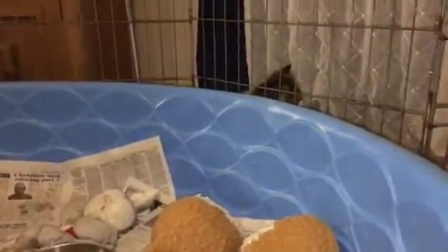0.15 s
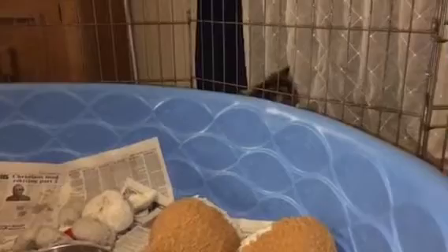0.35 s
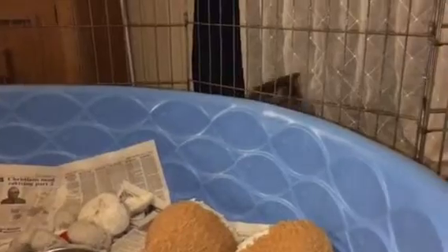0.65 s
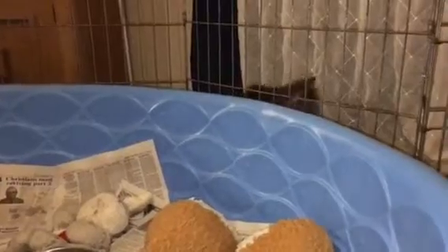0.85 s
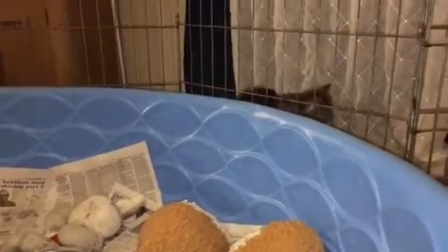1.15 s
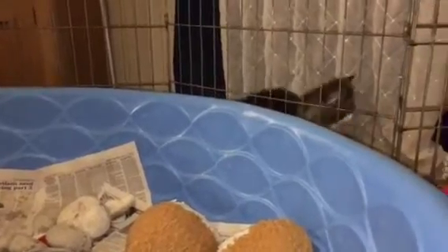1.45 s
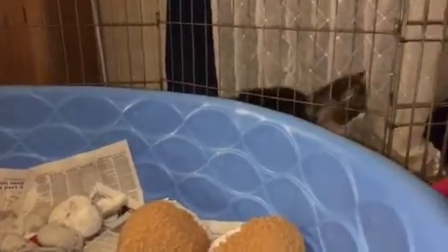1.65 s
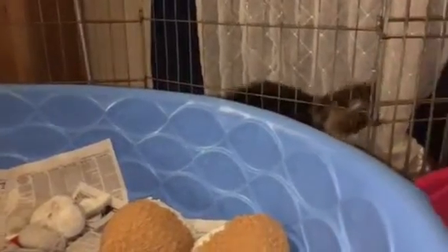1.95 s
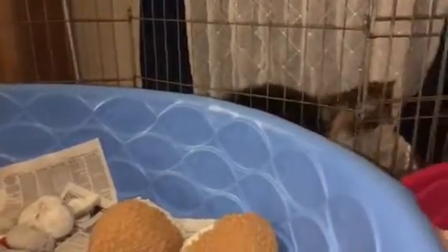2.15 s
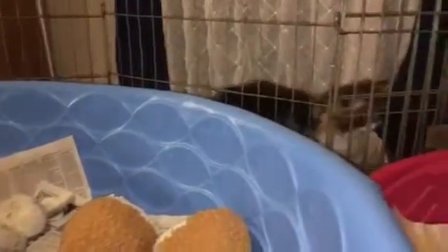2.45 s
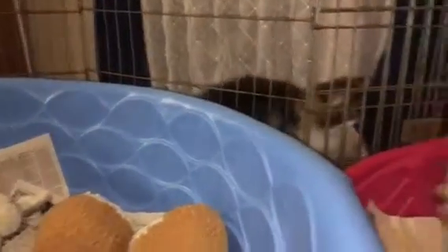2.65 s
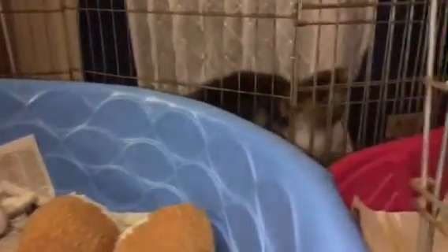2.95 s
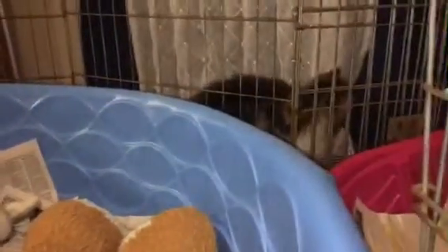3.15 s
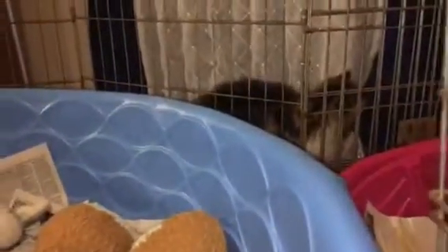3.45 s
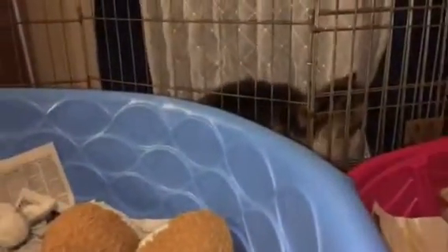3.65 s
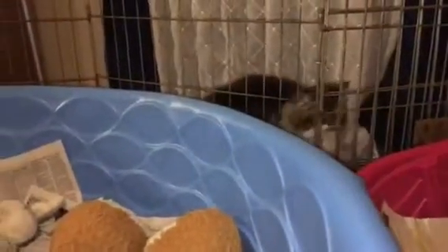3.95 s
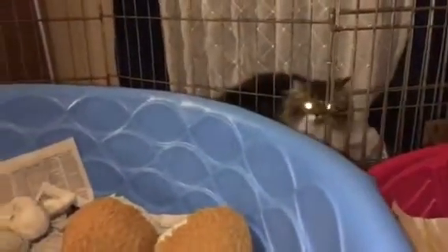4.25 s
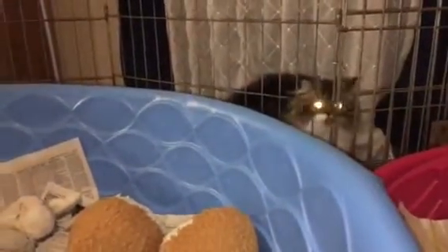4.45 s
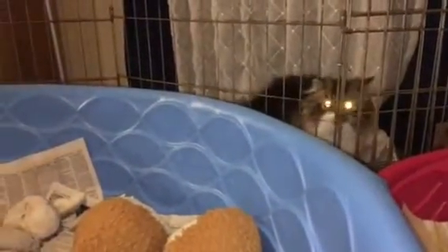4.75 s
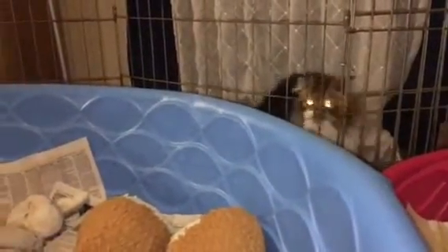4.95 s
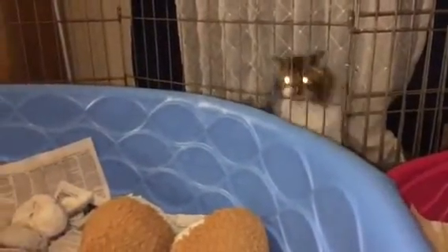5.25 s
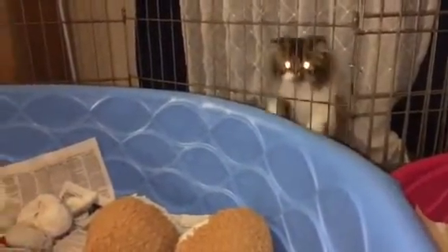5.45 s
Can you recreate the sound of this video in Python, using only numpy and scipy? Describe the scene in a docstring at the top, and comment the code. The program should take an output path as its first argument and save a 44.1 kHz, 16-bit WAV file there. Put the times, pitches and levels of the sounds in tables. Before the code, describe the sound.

In a small furnished room, a kitten and perhaps other young animals shift about on newspaper in a wire pen. From the start the paper crackles in quick irregular snaps with dull scuffing beneath, the sharpest crackle at about 0.4 s and another cluster near 0.7 s. Two deep, soft paw thuds land almost together at 0.75 s, with lighter steps around 1.0 s. At about 1.2 s a hard, hollow knock on plastic, the loudest event, rings very briefly among further thuds. Crisp paper ticks and short crumples continue to about 1.9 s, then thin out, with a small cluster near 2.4-2.6 s. Gentle bright rustling and ticks return around 3.6-4.0 s. The rest is nearly still: isolated crinkles at 4.7 and 5.3 s, and two very faint dull taps near 5.2 s. A faint wavering low hum and quiet room air lie underneath throughout; reflections are short.

```python
"""Small room, wire pen with newspaper and a plastic paddling pool: young animals move about.
Paper snaps (noise bursts coloured by a facet), crumples (dying slips) and slides (enveloped slips and noise).
Paws thud on the floor and a knock hits the plastic, with two faint taps later: both ring banks of modes.
An appliance hums faintly (wavering sine) over still air (coloured noise)."""
import sys
import numpy as np
from scipy import signal
from scipy.fft import rfft, irfft
from scipy.io import wavfile

SR = 44100
rng = np.random.default_rng(int(sys.argv[2]) if len(sys.argv) > 2 else 0)


def output_pcm(signal):
    """Save a mono or channel-first signal as 16-bit PCM at the path in sys.argv[1].

    Samples are clipped to [-1, 1] before scaling.
    """
    pcm = np.clip(np.atleast_2d(signal).T, -1, 1) * 32767
    wavfile.write(sys.argv[1], SR, np.round(pcm).astype(np.int16))


N = 246959
BINS_HZ = np.fft.rfftfreq(2048, 1 / SR)
TIME_S = np.arange(N) / SR
RING_S = np.arange(SR // 2) / SR

# Creases flipping over; levels before trim: time_s, level_db, facet_hz, tick_re_level_db
CREASE_SNAPS = [(0.0723, -48, 2980, -20), (0.096, -52.5, 3400, -11), (0.128, -46.5, 2590, -1),
                (0.151, -44, 2500, -16), (.1913, -50, 2300, -25), (.259, -50.5, 3570, -10),
                (.309, -44, 3900, -12), (0.3265, -45, 3600, -5), (0.3555, -45, 2640, -20),
                (0.3742, -54, 2970, -2), (.3833, -35.5, 3740, -5), (0.3885, -32, 2980, -24),
                (.484, -46.5, 5670, -3.5), (0.5385, -48.5, 4300, -8), (0.6835, -40.5, 3900, -13),
                (.6944, -38, 3320, -24), (0.7279, -48, 2420, -25), (1.216, -42, 2240, -10),
                (1.2507, -40, 5630, -4.5), (1.3751, -55, 3660, -9.5), (1.479, -38.5, 6080, -13),
                (1.6296, -48, 2920, -6), (1.69, -42, 2980, -24), (1.872, -49.5, 2800, -19),
                (1.8897, -42, 3150, -12), (2.196, -59.5, 3370, -18), (2.4113, -48, 2230, -15),
                (2.4755, -49, 2530, -7), (2.528, -48.5, 3000, -13), (2.5932, -48, 3500, -18),
                (2.6327, -51.5, 3160, -5), (2.9679, -52, 3000, -13), (3.272, -56.5, 1850, -12),
                (3.664, -48, 5040, 0.5), (3.7295, -57, 2220, -12), (3.7753, -57, 3300, -14),
                (3.788, -52, 2100, -8), (3.8232, -50.5, 3300, 1.5), (3.885, -56, 3040, 0),
                (3.9283, -53.5, 5430, -7), (3.9636, -57, 3400, -15), (4.2392, -65.5, 3190, -13),
                (4.259, -58.5, 1410, -23), (4.6891, -48.5, 4000, -9.5), (5.2665, -47.5, 6270, -8.5),
                (5.3366, -52.5, 6440, -13), (5.4976, -57.5, 2200, -19)]
# Paw crushes a patch of paper: time_s, level_db, t60_s, tilt_db_per_octave
PAPER_CRUMPLES = [(.127, -51, 0.32, 2.5), (.145, -57, 0.12, -9), (0.292, -49.5, 0.26, 0),
                  (0.323, -42.5, 0.08, -0.5), (0.384, -37.5, 0.11, -1), (.484, -48.5, 0.14, 0.5),
                  (.683, -39.5, 0.057, 1.5), (.692, -44, 0.21, -3.5), (1.417, -51.5, 0.15, -2.5),
                  (1.481, -52, 0.19, 2.5), (1.602, -51.5, 0.32, 1.5), (1.628, -44.5, 0.14, -1.5),
                  (1.870, -48, 0.09, -1.5), (1.911, -53, 0.14, -2), (2.628, -51, 0.087, -1),
                  (3.786, -52.5, 0.24, -3.5), (5.337, -59.5, 0.19, 1), (5.498, -56, 0.05, -4.5)]
# Paw drags the sheet; levels before trim; touch 0 = pressed, dull .. 1 = skimmed, bright:
# start_s, rise_s, length_s, level_db, touch, hiss_re_level_db
PAPER_STROKES = [(0, 0.0035, 0.18, -59.5, 0.17, -5), (0.227, 0.054, 0.15, -59, .45, -2),
                 (0.446, 0.018, 0.073, -56.5, .4, -9), (0.604, 0.025, 0.23, -67, 0.49, -4),
                 (0.764, .05, 0.07, -57.5, 0.46, -4), (0.918, 0.026, 0.048, -52.5, .1, -5),
                 (1.111, 0.097, 0.11, -59.5, 0.74, -4), (1.337, 0.027, 0.26, -65.5, 0.98, -14),
                 (1.603, .025, .12, -58, 0.18, -3.5), (1.843, .02, 0.072, -65.5, 0.24, -4),
                 (2.226, 0.074, 0.1, -60.5, 0.098, -4.5), (2.326, 0.051, 0.14, -57, 0.088, -6.5),
                 (2.603, .025, 0.061, -59.5, 0.31, -10), (2.955, 0.024, 0.16, -66, 0.46, -7.5),
                 (3.116, 0.094, 0.12, -59, 0.95, -3.5), (3.25, .04, .09, -68.5, 0.46, -3),
                 (3.375, .04, 0.25, -76, .6, -3), (3.563, 0.093, 0.27, -63, 0.98, 0.5),
                 (3.855, .04, 0.14, -66.5, 0.9, -0.5), (4.06, .04, 0.32, -77.5, 0.59, -0.5),
                 (4.55, .03, .08, -78.5, 0.51, -3.5), (4.73, .03, 0.05, -87, .8, -2),
                 (4.872, .09, 0.26, -77.5, 0.94, -2), (5.122, 0.067, 0.14, -70.5, 0.6, -4.5),
                 (5.32, .02, 0.064, -72, 0.81, -1), (5.565, 0.023, .04, -76.5, 0.16, -12)]
# Paw or flank scuffs the floor; levels before trim: start_s, length_s, level_db
FLOOR_SCUFFS = [(0, 0.22, -62), (0.276, 0.095, -52.5), (0.437, 0.21, -60.5), (0.774, 0.063, -51),
                (0.876, .14, -58), (1.09, 0.28, -58.5), (1.35, 0.085, -57.5), (1.611, 0.15, -59.5),
                (1.752, 0.089, -61), (2.005, 0.23, -65.5), (2.315, 0.25, -63.5), (2.59, 0.19, -68.5),
                (2.85, 0.27, -71), (3.29, 0.065, -65), (3.407, 0.25, -72.5), (3.63, 0.15, -64.5),
                (3.77, 0.22, -62), (4.204, 0.066, -71), (4.544, 0.029, -69.5), (5.11, 0.048, -66),
                (5.565, .03, -63.5)]
# Paw landings: time_s, level_db, favoured_hz, rattle_re_ring_db
PAW_THUDS = [(.384, -40.5, 100, -7), (.624, -43, 126, -14), (.71, -40, 271, -23),
             (.74, -21.5, 101.6, -19.5), (.76, -22.5, 136, -21.5), (0.784, -37.5, 292, -9),
             (1.014, -30.5, 103.4, -8.5), (1.034, -33, 79, -32), (1.183, -28.5, 201, -14),
             (1.204, -26.5, 129, -22), (1.255, -44, 243, -24), (1.342, -29.5, 168.6, -18.5),
             (1.382, -39, 136.7, -14), (1.49, -42.5, 70.4, -17), (1.68, -40.5, 204, -31),
             (1.701, -35, 130, -25), (1.824, -44, 232, -25), (1.834, -49, 81, -31), (1.864, -41, 62, -27),
             (2.067, -51, 70.5, -20), (2.343, -49, 192, -26), (2.385, -46, 66, -17), (2.84, -47.5, 55, -22),
             (2.973, -55, 145, -12), (3.787, -53, 212, -20.5), (5.189, -51.5, 230, -28.5),
             (5.322, -43, 121, -14)]
# Pen floor resonances: mode_hz, level_db, t60_s
FLOOR_MODES = [(55, -4, 0.22), (92, 1, 0.16), (132, 1.5, 0.15), (143.5, -5.5, 0.34), (193.4, -9.5, 0.18),
               (216, -9, 0.19), (249, -8.5, 0.16), (320.5, -5, 0.092), (348, -13, 0.11)]
# Blows on the plastic: time_s, level_db, fade_above_hz
PLASTIC_KNOCKS = [(1.1807, -19.5, 3000), (5.191, -51.5, 420), (5.198, -55.5, 520)]
# Plastic wall resonances: mode_hz, level_db, t60_s
WALL_MODES = [(334.4, -10.5, 0.137), (423, -8.5, .07), (492, -6, 0.044), (647, -3, 0.093), (827, 2, 0.085),
              (899, -1.5, 0.08), (1273, -2, .07), (1410, 1.5, 0.07), (1545, -1, 0.044), (1716, 1, 0.07),
              (1890, 1, .065), (2176, -4, .05), (2540, -6.5, 0.066), (3300, -10, 0.08)]
# Appliance tones, peak level before waver: tone_hz, level_db
HUM_TONES = [(119.6, -61)]
# Reverberation of the room: band_hz, t60_s
ROOM_DECAY = [(100, 1), (400, 0.52), (1500, 0.2), (5000, 0.17), (14000, 0.28)]

# Relative spectra, all with columns: frequency_hz, gain_db
# Paper body
PAPER_COLOUR = [(150, 2), (500, -5), (1000, -0.5), (2300, 2), (4000, -1), (5000, -3), (8000, -7),
                (10500, -12.5), (12500, -7), (16000, -31)]
# Fine tick of a crease
TICK_COLOUR = [(1000, -65.5), (4000, -7), (7000, -15.5), (9000, 5.5), (10500, -3), (12500, 0),
               (16000, -4.5)]
# Sheet pressed flat
PRESSED_COLOUR = [(600, -37), (1400, -6), (2100, 3), (3000, 0), (3900, 0), (4700, -5.5), (6000, -13),
                  (9000, -26.5), (14000, -25)]
# Sheet skimmed lightly
SKIMMED_COLOUR = [(600, -40), (2000, -16), (3200, 3), (4500, -2.5), (5900, 2), (7200, -5), (9000, -7.5),
                  (14000, -33.5)]
# Fine hiss of sliding
HISS_COLOUR = [(3000, -55.5), (6000, -7), (9000, 2.5), (10400, -3.5), (12500, -1.5), (16000, -11)]
# Dull floor scuffing
SCUFF_COLOUR = [(60, -30.5), (200, 7.5), (400, -2), (600, -2.5), (900, -3), (1500, -2.5), (2200, -6.5),
                (3000, -16.5), (6000, -65.5)]
# First crack of a knock
CRACK_COLOUR = [(80, -24.5), (200, -12), (350, 1), (540, -15), (800, -4.5), (1250, -2.5), (1800, -4.5),
                (2600, -16), (4500, -11), (7000, -21), (15000, -35)]
# Still room air
AIR_COLOUR = [(15, -43.5), (25, -11.5), (45, -2.5), (80, -4), (130, -7), (175, -13), (330, -14.5),
              (520, -23.5), (1000, -24.5), (2200, -31.5), (5500, -32.5), (9000, -36), (10500, -41.5),
              (15000, -39), (16000, -61)]

AIR_RMS_DB, EDGE_HZ = -64.5, 16200
GIVE_CYCLES = 3.43  # a crease gives within a few facet swings: large facets are slower
# Small creases flip by chance while the sheet is dragged
STRAY_PER_S, STRAY_SPREAD_DB, STRAY_HZ, STRAY_OCTAVES, STRAY_TICK_DB = 24, 3.5, 2520, 0.42, -15
SCUFF_RISE_S, RELEASE_S = 0.024, 0.029  # release is a time constant
SETTLE_DB, SETTLE_S = -11.5, 0.21  # the sheet relaxes, faintly; time constant
CONTACT_CYCLES = 0.25  # a softer paw stays longer and favours lower notes
# The struck spot pops before the whole wall rings
DENT_HZ, DENT_T60_S, DENT_RISE_S, DENT_DB = 1205, 0.0049, 0.0006, -2.5


def snaps(tick_trim_db=-1, facet_octaves=0.45, skirt_db=-8, flutter=0.132, flutter_t60_s=0.044):
    """Each crease sounds the facet that it moves, with a fine tick on top."""
    out = np.zeros(N)
    paper_db = read(PAPER_COLOUR, BINS_HZ) + read([(7000, 11.5), (10000, -0.5)], BINS_HZ)
    for time_s, level_db, facet_hz, tick_db in CREASE_SNAPS + stray_snaps():
        push = burst(GIVE_CYCLES / facet_hz, flutter, flutter_t60_s)
        octaves = np.log2((BINS_HZ + 1) / facet_hz)
        facet = np.exp(-0.5 * (octaves / facet_octaves) ** 2) + amp(skirt_db)
        body = colour(push, paper_db + 20 * np.log10(facet))
        tick = colour(push, read(TICK_COLOUR, BINS_HZ))
        sound = sized(body, level_db, 0.0045)
        sound = sound + sized(tick, level_db + tick_db + tick_trim_db, 0.0045)
        add(out, time_s - 0.004, sound)  # the click lies 4 ms into the burst
    return out


def stray_snaps(count=200):
    """Chance creases, in CREASE_SNAPS columns, whose loudness follows the dragging."""
    drag_db = 10 * np.log10(stroke_powers().sum(0))
    times_s = np.cumsum(rng.exponential(1, count)) / STRAY_PER_S
    rows = []
    for time_s, (loud, high) in zip(times_s, rng.standard_normal((count, 2))):
        if time_s < TIME_S[-1]:
            level_db = np.interp(time_s, TIME_S, drag_db) + STRAY_SPREAD_DB * loud
            rows.append((time_s, level_db, STRAY_HZ * 2 ** (STRAY_OCTAVES * high), STRAY_TICK_DB))
    return rows


def crumples(slips_per_s=3000, spread_db=4):
    """An avalanche of small slips that starts at once and dies away."""
    out = np.zeros(N)
    for time_s, level_db, t60_s, tilt_db in PAPER_CRUMPLES:
        slips = grains(len(RING_S), slips_per_s, spread_db) * dying(t60_s)
        tilt = tilt_db * np.log2(np.maximum(BINS_HZ, 500) / 3000)
        crushed = colour(slips, read(PAPER_COLOUR, BINS_HZ) + tilt)
        add(out, time_s, sized(crushed, level_db, t60_s / 10))
    return out


def sliding(rustle_trim_db=-1, hiss_trim_db=-1, scuff_trim_db=-1, clump_db=1.76):
    """Paper dragged over paper: clumps of slips heard as rustle, hiss and dull scuffing."""
    power = stroke_powers()
    *_, touch, hiss_db = np.transpose(PAPER_STROKES)
    skim = np.clip(touch, 0, 1)
    scuff_power = sum((amp(level_db) * held(start_s, SCUFF_RISE_S, length_s)) ** 2
                      for start_s, length_s, level_db in FLOOR_SCUFFS)
    # quieter dragging is smoother
    grainy = np.interp(10 * np.log10(power.sum(0)), [-78, -62], [0.3, 0.7])
    slips = grains(N, per_s=3000, spread_db=2.5) * amp(clump_db * wander(0.007))

    def voiced(shape):
        """Slips blended with smooth friction noise, in one colour."""
        drive = grainy * slips + (1 - grainy) * rng.standard_normal(N)
        drive = drive / np.hypot(grainy, 1 - grainy)
        return unit(colour(drive, read(shape, BINS_HZ)))

    pressed = np.sqrt((1 - skim) @ power) * voiced(PRESSED_COLOUR)
    skimmed = np.sqrt(skim @ power) * voiced(SKIMMED_COLOUR)
    hiss = np.sqrt(amp(hiss_db) ** 2 @ power) * voiced(HISS_COLOUR)
    scuff = np.sqrt(scuff_power) * voiced(SCUFF_COLOUR)
    return amp(rustle_trim_db) * (pressed + skimmed) + amp(hiss_trim_db) * hiss + amp(scuff_trim_db) * scuff


def held(start_s, rise_s, length_s):
    """Envelope of one drag: rise, hold, release and a faint settling tail."""
    after_s = np.maximum(TIME_S - start_s - length_s, 0)
    settle = amp(SETTLE_DB)
    fall = (1 - settle) * np.exp(-after_s / RELEASE_S) + settle * np.exp(-after_s / SETTLE_S)
    return np.clip((TIME_S - start_s) / rise_s, 0, 1) * fall


def stroke_powers():
    """Power of each stroke over time, one row per stroke."""
    return np.array([(amp(level_db) * held(start_s, rise_s, length_s)) ** 2
                     for start_s, rise_s, length_s, level_db, _, _ in PAPER_STROKES]) + 1e-16


def thuds(reach_octaves=0.28, rattle_t60_s=0.13, lowest_hz=55):
    """A soft paw pushes the floor's modes; loose things on it shudder along."""
    out = np.zeros(N)
    rattle_colour = read([(30, -37), (100, -9.5), (330, 16.5), (600, -9), (2000, -23)], BINS_HZ)
    highpass = signal.butter(3, lowest_hz, "high", fs=SR, output="sos")
    for time_s, level_db, favoured_hz, rattle_db in PAW_THUDS:
        ring = np.zeros(len(RING_S))
        for mode_hz, mode_db, t60_s in FLOOR_MODES:
            favour = 1 / (1 + (np.log2(mode_hz / favoured_hz) / reach_octaves) ** 2)
            ring += amp(mode_db) * favour * dying(t60_s) * np.sin(2 * np.pi * mode_hz * RING_S)
        rattle = colour(rng.standard_normal(len(RING_S)) * dying(rattle_t60_s), rattle_colour)
        paw = signal.windows.hann(int(CONTACT_CYCLES / favoured_hz * SR) + 3)
        blow = signal.oaconvolve(amp(rattle_db) * unit(rattle) - unit(ring), paw)
        # the slowest motion hardly reaches the air
        blow = signal.sosfilt(highpass, blow)
        add(out, time_s, sized(blow, level_db, 0.0072))
    return out


def knocks(ring_db=-0.5, crack_db=0.5, contact_s=0.00056, scatter=0.26, scatter_t60_s=0.062,
           swing_s=0.00099):
    """A sudden rough crack and the pop of the struck spot, then the plastic wall rings."""
    out = np.zeros(N)
    dent = np.sin(2 * np.pi * DENT_HZ * RING_S) * dying(DENT_T60_S) * (1 - np.exp(-RING_S / DENT_RISE_S))
    for time_s, level_db, fade_hz in PLASTIC_KNOCKS:
        ring = sum(amp(mode_db) * dying(t60_s) * np.sin(2 * np.pi * (mode_hz * RING_S + rng.random()))
                   for mode_hz, mode_db, t60_s in WALL_MODES)
        # the wall takes a moment to start swinging
        ring *= 1 - np.exp(-RING_S / swing_s)
        crack = colour(burst(contact_s, scatter, scatter_t60_s, click=3.6), read(CRACK_COLOUR, BINS_HZ))
        blow = np.zeros(len(RING_S))
        add(blow, 0, sized(crack, crack_db, 0.91))
        add(blow, 0.004, sized(ring, ring_db, 1) + sized(dent, DENT_DB, 1))
        # a soft blow leaves out the high notes
        softened = colour(blow, -10 * np.log10(1 + (BINS_HZ / fade_hz) ** 4))
        add(out, time_s - 0.004, sized(softened, level_db, 0.0036))
    return out


def background(waver_db=-2):
    """The appliance hum wavers a little over still room air."""
    hum = sum(amp(level_db) * np.sin(2 * np.pi * (tone_hz * TIME_S + rng.random()))
              for tone_hz, level_db in HUM_TONES)
    air_gain = amp(read(AIR_COLOUR, np.fft.rfftfreq(N, 1 / SR)))
    air = irfft(rfft(rng.standard_normal(N)) * air_gain, N)
    return hum * amp(waver_db * wander(0.084)) + amp(AIR_RMS_DB) * unit(air)


def room(x, early_db=5, early_t60_s=0.046, first_s=0.0052):
    """Near walls answer first; a short diffuse tail follows, each band dying at its own speed."""
    taps = rng.standard_normal(len(RING_S)) * (rng.random(len(RING_S)) < 0.2) * (RING_S > first_s)
    taps = taps * (1 + amp(early_db) * dying(early_t60_s))
    hz, t_s, bands = signal.stft(taps, SR, nperseg=256)
    decay = amp(-60 * t_s / read(ROOM_DECAY, hz)[:, None])
    tail = signal.istft(bands * decay, SR, nperseg=256)[1]
    return signal.oaconvolve(x, tail / np.linalg.norm(tail))[:N]


def burst(give_s, flutter, flutter_t60_s, click=4):
    """A knot of slips around one sharp click, 4 ms in, then a brief flutter."""
    t_s = RING_S[:SR // 20] - 0.004
    knot = np.exp(-abs(t_s) / give_s)
    after = flutter * (t_s > 0) * np.exp(-np.log(1000) * abs(t_s) / flutter_t60_s)
    slips = rng.standard_normal(len(t_s)) * (knot + after)
    return slips + click * (abs(t_s) == abs(t_s).min())


def grains(size, per_s, spread_db):
    """Tiny fibre slips at random moments: many small, a few large."""
    strength = amp(spread_db * np.minimum(rng.exponential(1, size), 4))
    present = rng.random(size) < per_s / SR
    return unit(strength * rng.choice([-1, 1], size) * present)


def wander(step_s):
    """Random values of rms about 1, one per step, joined by straight lines."""
    moments_s = np.arange(0, TIME_S[-1] + 1, step_s)
    return np.interp(TIME_S, moments_s, rng.standard_normal(len(moments_s)))


def dying(t60_s):
    """An envelope that falls 60 dB in t60_s."""
    return np.exp(-np.log(1000) * RING_S / t60_s)


def colour(x, gain_db):
    """Minimum-phase filter with the given gain at BINS_HZ: nothing sounds before the blow."""
    log_gain = np.log(amp(np.r_[gain_db, gain_db[-2:0:-1]]))
    taps = np.fft.ifft(np.exp(np.conj(signal.hilbert(log_gain)))).real
    half = len(BINS_HZ) // 2
    # turn the taps round if their weight lies at the end
    if abs(taps[:half]).sum() <= abs(taps[-half:]).sum():
        taps = np.roll(taps[::-1], 1)
    return signal.oaconvolve(x, taps[:len(BINS_HZ)])[:len(x)]


def read(points, hz):
    """Interpolates a table on a log-frequency axis."""
    f, value = np.transpose(points)
    return np.interp(np.log(hz + 1), np.log(f + 1), value)


def amp(db):
    """Decibels to gain."""
    return 10 ** (np.asarray(db) / 20)


def unit(x):
    """Scales to rms 1."""
    return x / np.sqrt(np.mean(x ** 2) + 1e-20)


def sized(x, level_db, span_s):
    """Gives a burst the energy of level_db rms held for span_s."""
    return amp(level_db) * x * np.sqrt(span_s * SR / (np.sum(x ** 2) + 1e-20))


def add(mix, time_s, sound):
    """Mixes a sound in at time_s."""
    part = mix[max(round(time_s * SR), 0):][:len(sound)]
    part += sound[:len(part)]


def scene(snap_room_db=-8, crumple_room_db=-9, thud_room_db=-16, knock_room_db=-13):
    """All sources; snaps, crumples, thuds and knocks each feed the room."""
    snap, crumple, thud, knock = snaps(), crumples(), thuds(), knocks()
    send = amp(snap_room_db) * snap + amp(crumple_room_db) * crumple
    send = send + amp(thud_room_db) * thud + amp(knock_room_db) * knock
    return (snap + crumple + thud + knock + sliding() + room(send) + background())[None]


def record(dry):
    """Linear-phase low-pass at EDGE_HZ."""
    lowpass = signal.firwin(511, EDGE_HZ, window=("kaiser", 9), fs=SR)
    return signal.oaconvolve(dry, lowpass[None], "same")


dry = scene()
out = record(dry)
output_pcm(out)
```